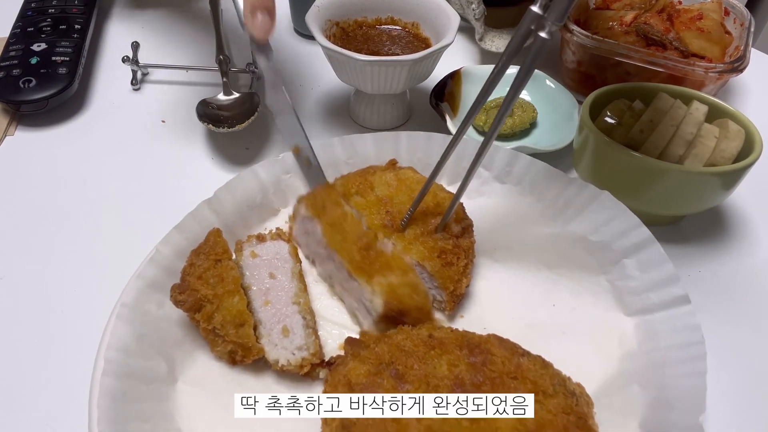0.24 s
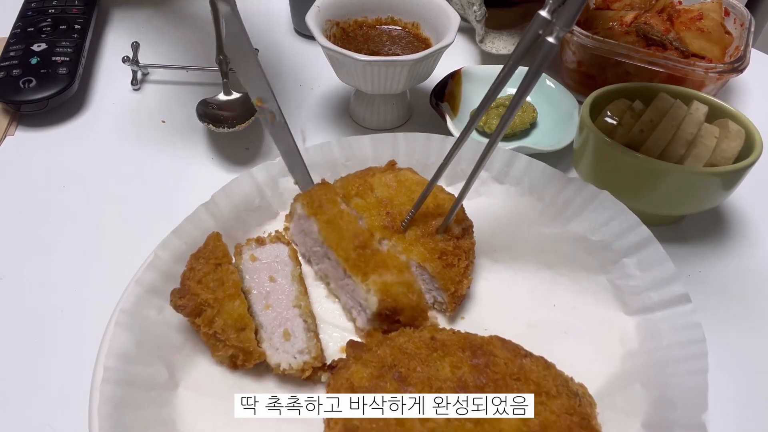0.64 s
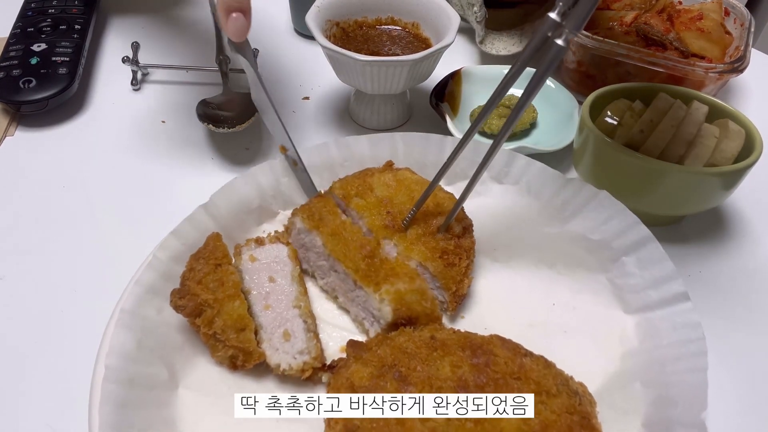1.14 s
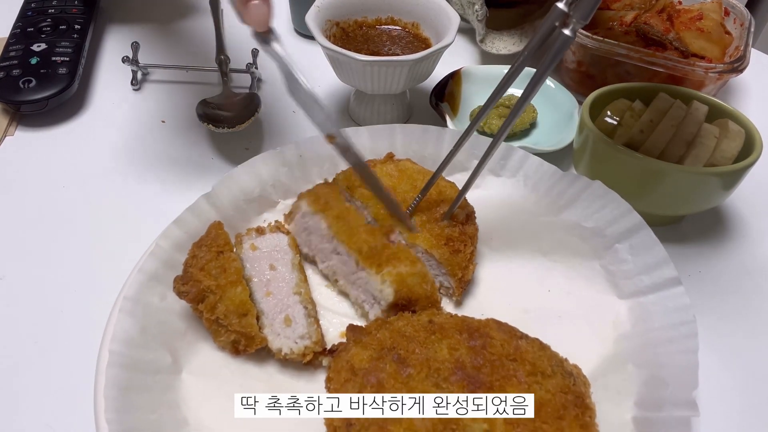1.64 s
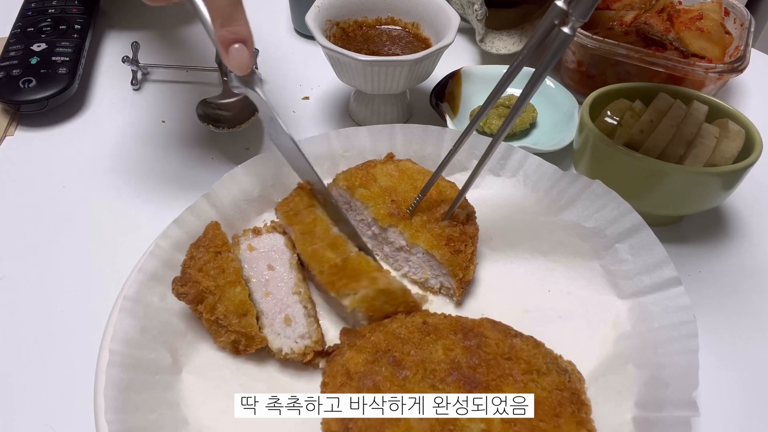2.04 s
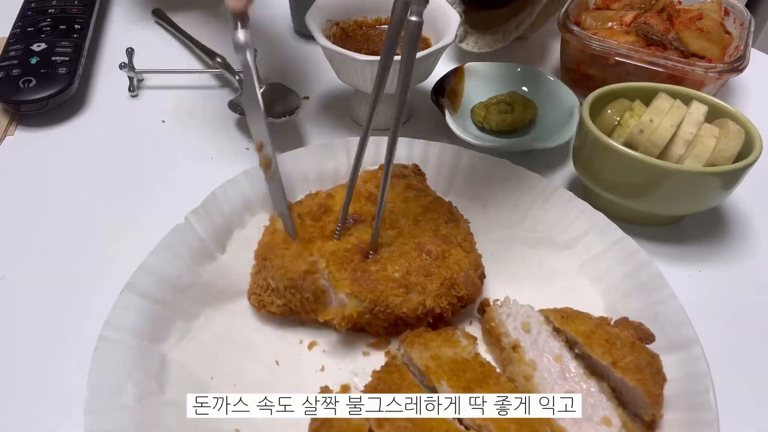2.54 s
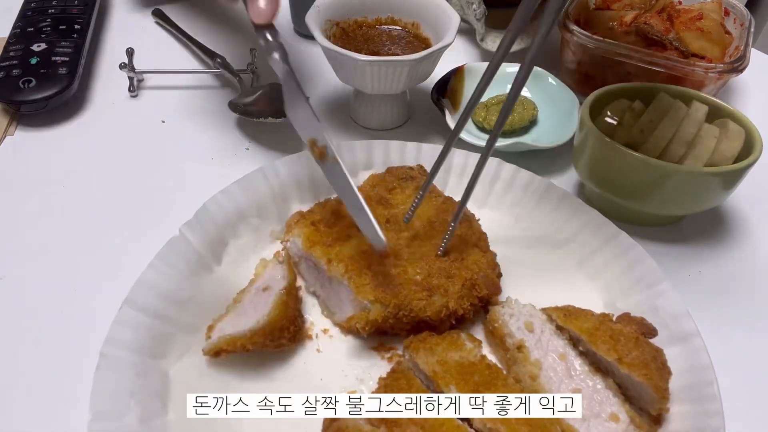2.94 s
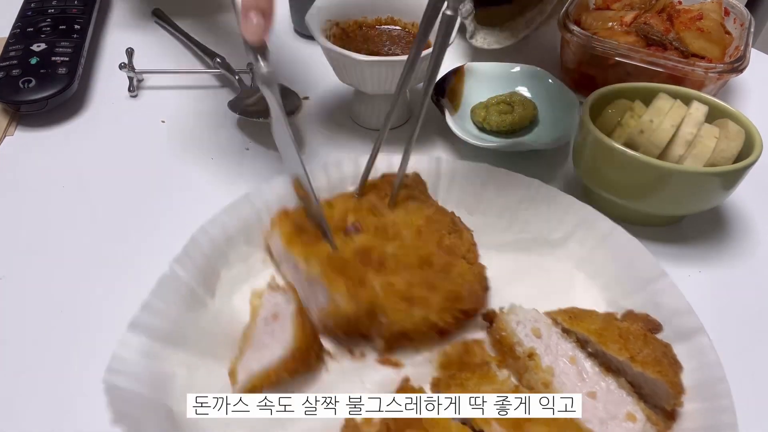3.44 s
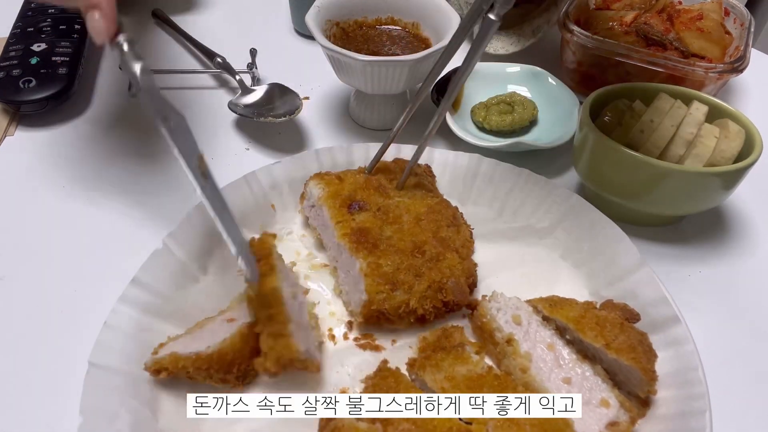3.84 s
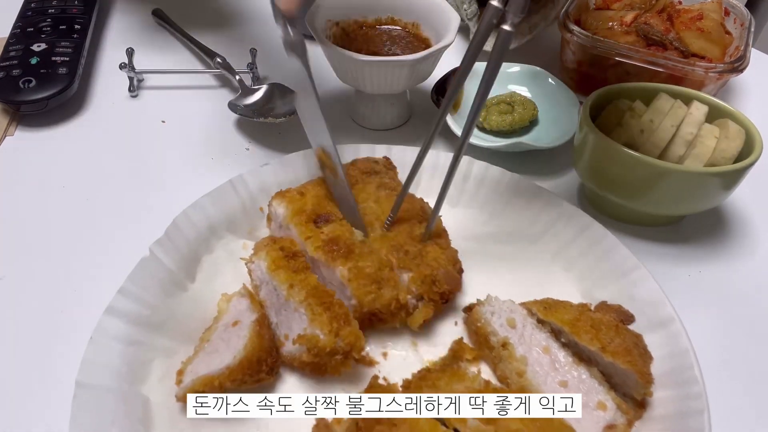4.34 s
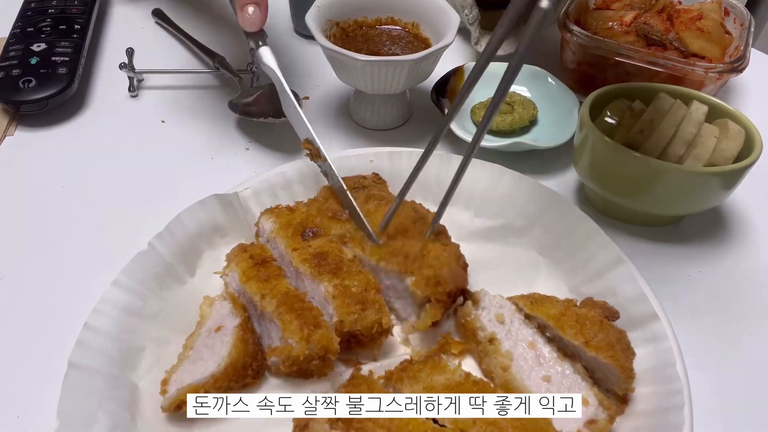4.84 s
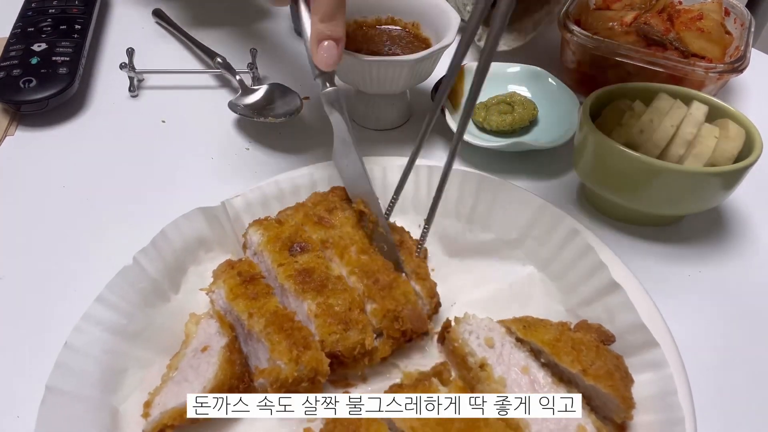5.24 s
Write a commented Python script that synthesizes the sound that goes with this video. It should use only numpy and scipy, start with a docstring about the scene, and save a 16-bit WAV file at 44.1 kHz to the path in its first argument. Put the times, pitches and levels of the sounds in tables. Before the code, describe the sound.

A serrated knife cuts a crisp breaded cutlet on a paper plate, heard close up in a small kitchen. From the start until about 1.1 seconds, a slow cut makes dense crunching and sharp, brittle cracks, strongest near 0.1, 0.4 and 0.7 seconds. The blade rings lightly and knocks the plate against the table with dull thuds, over a low hum. The crunch then thins to faint crackling, with one small snap near 2.2 seconds. At 2.3 seconds the hum abruptly gives way to a thin hiss and quick sawing begins. Each stroke is a rapid run of tooth ticks with a dry rasp and tiny squeaks on the paper. One stroke lasts until 2.7 seconds, followed by crumbling crust. Pairs of strokes follow from 3.1 to 3.7, from 4.1 to 4.7, and more briefly from 5.0 to 5.5 seconds.

```python
"""A serrated knife saws through a crisp breaded cutlet on a paper plate, heard close up in a small kitchen.
First a slow cut: brittle fracture makes the crust crack and crunch, and the blade rings and knocks the
plate against the table, over a low hum. After an abrupt change of scene come quick strokes over a thin
hiss: the teeth tick, rasp and squeak by stick-slip friction on the paper, about 27 times a second."""
import sys
import numpy as np
from scipy import signal
from scipy.fft import rfft, irfft
from scipy.io import wavfile
from scipy.ndimage import uniform_filter1d

SR = 44100
rng = np.random.default_rng(int(sys.argv[2]) if len(sys.argv) > 2 else 0)


def digitize_waveform(pressure):
    """Quantize a signal to 16-bit integers and store it at the path in sys.argv[1].

    Rows of a 2-D input are taken as channels; values are limited to [-1, 1].
    """
    field = np.atleast_2d(pressure).T
    bounded = np.clip(field, -1, 1)
    quanta = np.round(bounded * 32767).astype(np.int16)
    wavfile.write(sys.argv[1], SR, quanta)


N = 242977
SIZE = 2 ** 14  # samples in an impulse response
TIME, FREQ = np.arange(N) / SR, np.arange(SIZE // 2 + 1) * SR / SIZE
CHANGE_S = 2.315
SLOW, QUICK = TIME < CHANGE_S, TIME > CHANGE_S
CRISP_HZ = 5600  # "body" lies below, "crisp" above; levels in dB are relative within each layer


# Pushes of the blade. Each row: peak, rise and fall in seconds, then body, crisp and plate levels in dB.
BLADE_PUSHES = [(.048, 0.043, 0.078, -30, -32, -45.5), (.113, 0.041, 0.1, -32, -35, -30),
                (.215, 0.046, 0.05, -50, -60, -43), (.275, 0.09, 0.046, -30, -30, -56),
                (.385, 0.011, 0.12, -32, -35, -75), (.432, 0.098, 0.066, -31.5, -31.5, -42.5),
                (.462, 0.026, 0.041, -52, -50, -40.5), (.583, 0.042, 0.083, -33, -30.5, -49),
                (.607, 0.035, 0.064, -37.5, -35, -43.5), (.698, 0.047, 0.059, -24, -25.5, -29),
                (.763, 0.062, 0.045, -26, -27.5, -43.5), (.797, 0.018, 0.038, -24, -32, -43),
                (.886, 0.069, 0.067, -29.5, -33, -44.5), (1.002, 0.033, 0.053, -35, -37.5, -39),
                (1.053, 0.07, .02, -36, -40, -38.5), (1.15, 0.19, .24, -47, -49.5, -53),
                (1.35, .12, 0.1, -50, -48.5, -70), (1.53, 0.071, 0.058, -60.5, -62, -82.5),
                (1.595, 0.016, 0.097, -55, -54.5, -72.5), (1.85, 0.043, 0.13, -59, -57, -93),
                (1.94, 0.09, 0.11, -54.5, -53, -90), (2.06, 0.19, 0.55, -46, -44.5, -95),
                (2.27, 0.25, 0.17, -45.5, -41.5, -95)]

def slow_cut(count=4):
    """Forced vibration: each push crushes and scrapes the crust and drives the blade."""
    friction = np.sqrt(swells(BLADE_PUSHES)[:2]) * clumps(per_s=110, depth_db=5) * SLOW
    out = blade(friction[0]) + scrapes()
    for k, (stretch, share) in enumerate(spots(shift=.06, wander_db=4, count=count)):
        crust = crunch(friction * share, stretch) + cracks(k, count, stretch)
        out += kitchen(crust, right_db=-.6, near=(-4.5, .008), room=(-12, .18))
    return out

# The loudest snaps. Each row: start in seconds, body and crisp energies in dB, crumbling time in seconds.
CRUST_SNAPS = [(.022, -14, -10, .0008), (.0334, 0, 1, .0006), (.0407, -6, -2, .0006), (.048, -8, -7, .001),
               (.0543, -7, -8.5, .001), (.1113, -8, -5, .001), (.1135, -3, -.5, .001),
               (.1195, -5, -2.5, .0008), (.1263, -8, -3, .001), (.1345, -13, -13, .0008),
               (.1991, -25, -22, .0006), (.3622, -11, -17, .0014), (.3767, -3.5, -4.5, .001),
               (.402, -11, -8.5, .0014), (.4245, -6, -4, .0014), (.427, -7, -4, .001), (.431, -3, -2, .001),
               (.4365, -7, -5, .0014), (.4408, -8, -9, .0014), (.4465, -7, -2, .0014),
               (.6516, -18, -14, .0006), (.683, -6, -4.5, .0014), (.6897, -3.5, 7.5, .0005),
               (.7132, -7, 3.5, .0003), (.725, -9, -8, .0008), (.7434, -23, -9.5, .0006),
               (.774, -22, -12, .0005), (.7818, -25, -4, .0005), (.7868, -25, -7, .0004),
               (.7898, -22, -4, .0003), (.8002, -16, -4, .0003), (.8026, -10, -1, .0006),
               (.8836, -28, -16, .001), (.902, -25, -10, .0008), (1.0612, -23, -14.5, .0008),
               (1.1125, -17, -14, .0015), (1.4312, -33, -27, .002), (1.549, -41, -33, .001),
               (1.582, -24.5, -20, .0035), (1.1687, -35, -17, .001), (1.2564, -28, -16, .0008),
               (2.2133, -36, -3.5, .0003)]
# Spectrum of a snap. Each row: frequency in Hz, level in dB.
SNAP_SPECTRUM = [(300, -9), (900, -15), (1250, 0), (1900, 3.5), (2800, -1), (3800, -7.5), (5000, 1.5),
                 (7000, -1), (10000, -10), (13000, -7), (16000, -11)]

def cracks(spot, count, stretch):
    """Brittle fracture: large flakes of crust release their elastic energy all at once."""
    flakes = np.array(CRUST_SNAPS)[spot::count]
    drive = snaps(flakes[:, :3], crumble=5.4, crumble_s=flakes[:, 3])
    return amp(-.5) * contact(drive, SNAP_SPECTRUM, stretch, low_hz=370, bend_s=.00028, order=3)

# Spectrum of crushed crust. Each row: frequency in Hz, level in dB.
CRUNCH_SPECTRUM = [(400, -7.5), (900, -14), (1300, -13.5), (1850, -6), (2800, -11.5), (3750, -6),
                   (4600, -0.5), (5500, 1.5), (6700, 6.5), (9000, -2), (12500, -7.5), (14000, -3),
                   (15500, -21)]

def crunch(friction, stretch):
    """Acoustic emission: many small fractures and a few larger ones merge into a fizz."""
    crumbs = grains(per_s=3000, spread_db=3.5) + amp(-9) * grains(per_s=70, spread_db=1.2)
    drive = friction * crumbs
    return amp(-1.2) * contact(drive, CRUNCH_SPECTRUM, stretch, low_hz=508, bend_s=.000092, order=3)

# Scrapes of the edge. Each row: centre and length in seconds, pitch in Hz, level in dB.
EDGE_SCRAPES = [(.0425, 0.0042, 1176, -24), (.0495, 0.0043, 1150, -34.5), (.056, 0.0081, 1190, -32.5),
                (.073, 0.024, 1280, -46), (.103, 0.015, 1800, -42), (.1145, 0.0081, 1910, -24.5),
                (.277, .036, 1380, -44.5), (.38, 0.0074, 1760, -40.5), (.403, 0.015, 1510, -41.5),
                (.434, 0.028, 1175, -35.5), (.594, 0.035, 1360, -46), (.688, 0.023, 1800, -33),
                (.806, 0.0051, 1750, -51), (.975, 0.055, 6470, -46.5), (1.02, 0.033, 5530, -48),
                (1.114, 0.0048, 1330, -39), (2.08, 0.081, 1850, -63.5), (2.24, .09, 1820, -64)]

def scrapes():
    """Resonance: the scraped crust answers with a hollow note."""
    return kitchen(judders(EDGE_SCRAPES, width_hz=480), right_db=.5, near=(-10, .013), room=(-8.5, .2))

# The blade breaks through. Each row: start in seconds, plate level in dB, length of the push in seconds,
# blade level in dB, place from 0 (middle) to 1 (rim).
BREAKTHROUGHS = [(.034, -10, 0.0025, -29.5, 0), (0.1151, 6.5, 0.00024, -0.5, 0),
                 (0.261, 3.5, 0.0068, -15, 0.15), (0.4479, 0, 0.0042, -9, 0), (.568, -17.5, 0.0013, -23, 0),
                 (0.6931, -1.5, 0.0013, -5, 0.92), (.745, -4, 0.00024, -8, 0.59),
                 (0.886, -15.5, 0.0031, -26, 0), (1.012, -10.5, 0.0017, -16, 0.16),
                 (1.039, -9, 0.0023, -40, 0.9)]

def knocks():
    """Cushioned impact: the blade knocks the plate through the meat; a longer push sounds duller."""
    out, t = np.zeros(N), TIME[:SIZE]
    for start, db, length, _, rim in BREAKTHROUGHS:
        push = t * np.exp(-t * 2 * np.pi / length)
        add(out, start, amp(db) * irfft(rfft(push / push.sum()) * plate_response(rim)))
    return out * amp(4.5)

# Modes of the loaded plate. Each row: frequency in Hz, level in dB, T60 in seconds, rim change in dB.
PLATE_MODES = [(141.5, -20.5, .36, -10), (263, -24.5, .3, 9), (735, -21, .05, 0), (328, -4, .04, 0),
               (410, -7, .03, 0), (562, 3.5, .026, 0), (620, -5, .02, 0), (1470, -25, .03, 0)]

def plate_response(rim):
    """Mode shapes: toward the rim the plate's lowest mode gives way to the second."""
    return ringing([(hz, db + rim * rim_db, t60) for hz, db, t60, rim_db in PLATE_MODES])

def plate():
    """Free and forced vibration: the plate thuds at each knock and shudders under the dragging blade."""
    shake = np.sqrt(swells(BLADE_PUSHES)[2]) * SLOW
    shudder = amp(-1.5) * filtered(shake * grains(per_s=2000, spread_db=-2), plate_response(rim=.37))
    return kitchen(knocks() + shudder, right_db=3.5, near=(-16, .012), room=(-15, .28))

# Modes of the blade. Each row: frequency in Hz, level in dB, T60 in seconds.
BLADE_MODES = [(1880, -9.5, .04), (2220, -3.5, 0.039), (2580, -6, 0.12), (3743, 3.5, 0.066),
               (4240, -5.5, 0.027), (6500, -9.5, 0.055)]

def blade(friction):
    """Modal ringing: the steel rings as it breaks through, and sings faintly under a firm push."""
    firmness = np.sqrt(friction / (friction + amp(-32.5)))
    force = amp(-14.5) * friction * firmness * grains(per_s=3900, spread_db=-2)
    for start, _, _, db, _ in BREAKTHROUGHS:
        add(force, start, amp([db]))
    return filtered(force, ringing(BLADE_MODES)) * np.ones((2, 1))

# Quick strokes. Each row: first and last tooth in seconds, number of teeth, speed-up as a fraction,
# body and crisp levels in dB.
SAW_STROKES = [(2.342, 2.688, 10, 0.15, -38.5, -37), (3.087, 3.363, 8, -0.12, -40, -38),
               (3.463, 3.695, 9, 0.34, -43, -66), (4.108, 4.387, 9, -0.022, -42.5, -43),
               (4.429, 4.655, 7, 0.049, -39, -39), (5.022, 5.172, 5, 0.17, -40.5, -40),
               (5.327, 5.484, 5, 0.13, -40.5, -43.5)]

def passing_teeth(scatter_db=4, ease_db=2):
    """Tooth rate is speed over spacing; gives each tooth's time in seconds, body and crisp dB."""
    teeth = []
    chances = rng.standard_normal((len(SAW_STROKES), 32))
    for (first, last, count, speed_up, body, crisp), chance in zip(SAW_STROKES, chances):
        for travel, luck in zip(np.linspace(0, 1, count), chance):
            press_db = scatter_db * luck - ease_db * (2 * travel - 1) ** 2  # lighter at both ends
            elapsed = travel + speed_up * travel * (1 - travel)
            teeth.append((first + (last - first) * elapsed, body + press_db, crisp + press_db))
    return teeth

def rubbing(fade_s=.038):
    """Sliding friction: the flat of the blade rubs all through a stroke; body and crisp power."""
    power = 0
    for first, last, _, _, body, crisp in SAW_STROKES:
        outside_s = np.abs(TIME - np.clip(TIME, first, last))
        power += np.outer(amp([body - 14.5, crisp - 18]) ** 2, np.exp(-2 * outside_s / fade_s))
    return power

SCUFF_S, SCUFF_LAG_S = .0037, .002934  # a scuff is strongest just after the tooth lets go

def scuffs(teeth):
    """Slip: each tooth gives a bell-shaped burst of friction; body and crisp power."""
    power = np.zeros((2, N))
    t = np.arange(-2 * SCUFF_S, 2 * SCUFF_S, 1 / SR)
    bell = .5 ** ((2 * t / SCUFF_S) ** 2)
    for start, *levels in teeth:
        for track, db in zip(power, levels):
            add(track, start + SCUFF_LAG_S + t[0], amp(db) ** 2 * bell)
    return power

# A slice parts and crumbles. Each row: peak, rise and fall in seconds, body and crisp levels in dB.
CRUMBLING = [(2.69, 0.075, 0.16, -47, -44.5), (2.85, 0.039, 0.11, -55.5, -46),
             (3.3, 0.069, 0.11, -59, -48.5), (3.49, 0.065, 0.028, -38.5, -40),
             (3.675, 0.22, 0.085, -45, -39.5), (3.78, 0.052, 1, -67, -61.5),
             (4.235, 0.028, 0.031, -48, -48), (4.375, 0.099, 0.029, -47, -49),
             (4.79, 0.1, 0.17, -61.5, -54.5), (5.45, 0.12, 0.099, -39.5, -41.5)]
# Modes of the paper. Each row: frequency in Hz, level in dB, T60 in seconds.
PAPER_MODES = [(1135, 5.5, 0.03), (2110, -1, 0.022), (3100, -4, 0.025), (4760, -6, 0.015)]

def sawing(count=4, wall_s=.0093):
    """Impact and friction: the teeth tick and rasp and excite the paper; a nearby wall reflects it all."""
    teeth, rub = passing_teeth(), rubbing()
    crumbling = swells(CRUMBLING) * clumps(per_s=170, depth_db=8) ** 2 * QUICK
    uneven_rub = rub * clumps(per_s=150, depth_db=15) ** 2
    friction = amp(-3.5) * np.sqrt(scuffs(teeth) + uneven_rub + crumbling) * QUICK
    out = squeaks(teeth)
    for k, (stretch, share) in enumerate(spots(shift=.015, wander_db=2.5, count=count)):
        scuff = rasp(share * friction, rub + crumbling, k, count, stretch)
        tick = ticks(teeth, k, count, stretch)
        paper = amp(-19) * filtered(scuff + tick, ringing(PAPER_MODES))
        out += kitchen(scuff + paper, right_db=2, near=(0, .018), room=(-7, .042))
        out += kitchen(tick, right_db=3, near=(-8, .016), room=(-15, .06))
    wall_echo = amp(-18) * filtered(out[::-1], np.exp(-2j * np.pi * FREQ * wall_s))
    return out + wall_echo

# Teeth that catch hard. Each row: start in seconds, body and crisp energies in dB.
HARD_CATCHES = [(2.3901, -8, -20), (2.431, -6.5, -8.5), (2.472, -11.5, -12), (2.512, -24, -33),
                (2.5473, -3.5, -10), (2.5843, -21, -11), (2.6227, -13.5, -20), (2.657, -12, -24),
                (2.684, -12, -11.5), (3.1235, -8, -16.5), (3.159, -4.5, -12.5), (3.194, -4, -0.5),
                (3.2305, -7, -7), (3.2695, -23, -13), (3.3636, -9.5, -10), (3.4945, -15, -15),
                (3.6803, -14.5, -18), (3.7022, -14, -14), (4.146, -16.5, -18), (4.1797, -13, -12),
                (4.248, -12, -8.5), (4.2869, -6.5, -6.5), (4.3232, -9, -14), (4.3936, -3, -7.5),
                (4.4349, -12.5, -11.5), (4.4724, -21, -17), (4.511, -24, -40), (4.5457, -22.5, -42),
                (4.5828, -4, -13), (4.6153, -2, -7), (4.646, -13, -21), (5.0604, -10, -10.5),
                (5.108, -23, -31), (5.1408, -12, -15), (5.4431, -14, -17)]
# Spectrum of a tick. Each row: frequency in Hz, level in dB.
TICK_SPECTRUM = [(150, -20), (300, -53), (450, -15), (800, -25), (1120, 1), (1600, -2), (2400, 2),
                 (3100, 7.5), (3750, -4.5), (4250, 4.5), (4800, 10.5), (5130, 6), (5350, -10), (5900, -3),
                 (7200, -3.5), (10000, 3), (14500, 12)]

def ticks(teeth, spot, count, stretch):
    """Elastic release: some teeth catch hard and let go; the others only tick."""
    catch_times = np.array(HARD_CATCHES)[:, 0]
    light = [(start, body + 4.5, crisp + 4.5) for start, body, crisp in teeth
             if np.min(np.abs(catch_times - start)) > .012]
    drive = snaps((HARD_CATCHES + light)[spot::count], crumble=.3, crumble_s=.0005)
    return contact(drive, TICK_SPECTRUM, stretch, low_hz=245, bend_s=.000914, order=8)

# Single flakes break off. Each row: start in seconds, crisp energy in dB.
LOOSE_FLAKES = [(2.5999, -12.5), (2.6355, -13.5), (2.6523, -11.5), (2.6928, -12), (2.7125, -12.5),
                (2.7388, -10), (2.7617, -18.5), (2.77, -16), (2.8, -17.5), (2.8228, -22), (2.837, -12.5),
                (2.866, -17), (3.282, -15.5), (3.5715, -20), (3.6518, -17), (3.7813, -18), (4.161, -15)]
# Spectrum of the rasp. Each row: frequency in Hz, level in dB.
RASP_SPECTRUM = [(150, -43), (300, -25.5), (450, -9), (800, -17), (1120, 0), (1700, -4.5), (2300, -2.5),
                 (3100, -4.5), (3900, -6.5), (4700, -6), (5800, -4.5), (8000, -9.5), (11000, -10.5),
                 (14500, -4)]

def rasp(friction, stray_power, spot, count, stretch):
    """Roughness noise: friction comes in tiny grains, while flakes snap and stray crumbs crackle."""
    grit = friction * grains(per_s=3500, spread_db=4.5)
    flakes = [(start, db - 15.5, db) for start, db in LOOSE_FLAKES[spot::count]]  # hardly any body
    breaks = snaps(flakes, crumble=2, crumble_s=.002)
    strays = amp([[-15], [-9]]) * np.sqrt(stray_power) * grains(per_s=60, spread_db=5.5) * QUICK
    return contact(grit + breaks + strays, RASP_SPECTRUM, stretch, low_hz=124, bend_s=.000652, order=8)

# The louder squeaks. Each row: centre and length in seconds, pitch in Hz, level in dB.
PAPER_SQUEAKS = [(2.347, 0.007, 1110, -45.5), (2.4695, 0.0072, 1290, -30.5), (2.508, 0.0098, 1110, -37.5),
                 (2.543, 0.0062, 1130, -36.5), (3.319, 0.013, 1120, -42), (3.462, 0.0087, 1080, -41.5),
                 (4.508, 0.0058, 1440, -40), (5.366, 0.013, 1170, -44.5), (5.41, 0.02, 1150, -42.5),
                 (5.446, 0.013, 1156, -41), (5.478, 0.012, 1130, -51)]

def squeaks(teeth, pitch_hz=1164, length_s=.0043):
    """Stick-slip on paper: a faint, rough note for every tooth, and a few loud ones."""
    faint = [(start + SCUFF_LAG_S, length_s, pitch_hz * np.exp(.055 * luck), body - 9.5)
             for (start, body, _), luck in zip(teeth, rng.standard_normal(SIZE))]
    notes = judders(PAPER_SQUEAKS + faint, width_hz=300)
    return kitchen(notes, right_db=3, near=(-9, .013), room=(-14, .098))

def judders(table, width_hz):
    """Stick-slip excitation: each burst of irregular slips rings one broad resonance."""
    out = np.zeros(N)
    for (centre, length, hz, db), slips in zip(table, rng.standard_normal((len(table), SIZE))):
        t = np.arange(-1.5 * length, 1.5 * length, 1 / SR)
        b, a = signal.iirpeak(hz, hz / width_hz, fs=SR)
        note = signal.lfilter(b, a, signal.lfilter(b, a, slips))[-len(t):]
        note *= .5 ** ((2 * t / length) ** 2)
        add(out, centre + t[0], amp(db) * np.sqrt(length * SR) * note / np.linalg.norm(note))
    return out

def snaps(table, crumble, crumble_s):
    """Stress release: one sharp impulse, then a moment of crumbling; body and crisp drives."""
    drive, t = np.zeros((2, N)), TIME[:SR // 50]
    fades = np.broadcast_to(crumble_s, len(table))
    for (start, *levels), fade in zip(table, fades):
        force = rng.standard_normal(len(t)) * np.exp(-t / fade)
        force *= crumble / np.linalg.norm(force)
        force[0] = 1
        for track, db in zip(drive, levels):
            add(track, start, amp(db) * force / np.linalg.norm(force))
    return drive

def swells(table, rounding=.85):
    """Loading and release: power moves 20 dB over each rise and fall, one track for each level column."""
    power = 0
    for peak, rise, fall, *levels in table:
        away = np.abs(np.where(TIME < peak, (peak - TIME) / rise, (TIME - peak) / fall))
        power += np.outer(amp(levels) ** 2, amp(-20 * away ** rounding) ** 2)
    return power

def grains(per_s, spread_db):
    """A Poisson process: tiny fractures of uneven size at random moments; rms 1."""
    size = amp(spread_db * np.minimum(rng.exponential(size=N), 4)) * rng.choice([-1, 1], N)
    impulses = size * (rng.random(N) < per_s / SR)
    return impulses / np.std(impulses)

def clumps(per_s, depth_db):
    """Amplitude modulation: crust gives way in uneven clumps; a wandering gain of rms 1."""
    steps = np.cumsum(rng.uniform(.5, 1.5, SIZE)) / per_s
    gain = amp(depth_db * np.interp(TIME, steps, rng.uniform(-1, 1, SIZE)))
    return gain / np.sqrt(np.mean(gain ** 2))

def spots(shift, wander_db, count):
    """A moving contact point: each spot has its own frequency stretch and share of the friction."""
    steps = np.arange(0, TIME[-1], .02)
    wander = rng.standard_normal((count, len(steps)))
    share = amp([wander_db * np.interp(TIME, steps, path) for path in wander])
    return zip(1 + shift * np.linspace(-1, 1, count), share / np.linalg.norm(share, axis=0))

def contact(drive, spectrum, stretch, low_hz, bend_s, order):
    """Dispersion: bending waves bring the treble of both coloured drives first, 1 kHz bend_s later."""
    gain = colour(np.array(spectrum) * [stretch, 1]) * highpass(low_hz, order=3)
    crossover = highpass(CRISP_HZ, order)
    body = unit(gain * np.sqrt(1 - crossover ** 2), band=FREQ > 800)
    crisp = unit(gain * crossover)
    bending = np.exp(-4j * np.pi * bend_s * np.sqrt(1000 * FREQ))
    return filtered(drive[0], causal(body) * bending) + filtered(drive[1], causal(crisp) * bending)

def ringing(modes):
    """Modal superposition: the response of damped modes, shaped by a small object's weak bass radiation."""
    t = TIME[:SIZE]
    ring = sum(amp(db) * np.cos(2 * np.pi * hz * t) * amp(-60 * t / t60) for hz, db, t60 in modes)
    tone = colour([(630, 12), (850, -3), (1400, -9.5), (4000, -.5), (9000, -11)])
    return unit(rfft(ring) * causal(highpass(130, order=2) * tone))

def kitchen(x, right_db, near, room):
    """Reverberation: near scatter off table and dishes, then the room; each is (dB, T60 in seconds)."""
    t, echoes = TIME[:SIZE], 0
    for (db, t60), apart_hz in ((near, 4000), (room, 350)):
        tail = diffuse(apart_hz, count=SIZE) * amp(-60 * t / t60) * (t > .0004)
        echoes += amp(db) * unit(rfft(tail))
    return filtered(x, 1 + echoes) * amp([[-right_db / 2], [right_db / 2]])

# The left microphone port against the right. Each row: frequency in Hz, phase lead in radians at the
# crust and deep in the cut, level in dB.
PORT_CUES = [(20, 0, 0, 0), (300, -.2, -.1, -1), (600, -.3, -.4, -4), (1000, -.1, 0, -8),
             (1300, -.2, .1, -10), (1900, -.4, -.3, -3.5), (2500, -.7, -.4, -3.5), (3600, -1.6, -.3, -1),
             (5000, -2.4, -.7, -4), (7000, -1.7, -1.3, -3), (8500, -.7, -.7, -.5), (10500, 0, 0, 0),
             (12300, 2.1, 2.1, 0), (14500, 3.1, 3.1, -.5)]

def ports(x, deep_from_s=.41, deep_to_s=.78):
    """Near field: each port hears its own level and phase; the phase shifts as the blade sinks in."""
    hz, *columns = np.transpose(PORT_CUES)
    shallow_lead, deep_lead, db = (np.interp(FREQ, hz, column) for column in columns)
    deep = uniform_filter1d(1. * ((TIME > deep_from_s) & (TIME < deep_to_s)), size=SR // 25)
    return sum(filtered(x * share, np.array([amp(db / 2) * np.exp(1j * lead), amp(-db / 2)]))
               for share, lead in ((1 - deep, shallow_lead), (deep, deep_lead)))

# Spectra of the hum and the hiss. Each row: frequency in Hz, spectral density in dB.
HUM_SPECTRUM = [(15, -55.5), (25, -18), (80, -7.5), (170, -7), (217, -10), (489, -16.5), (591, -37.5),
                (695, -22.5), (754, -30), (1940, -60), (5000, -62), (14400, -69.5), (16000, -41.5)]
HISS_SPECTRUM = [(35, -101), (60, -89), (287, -13), (338, -17.5), (427, -3), (503, -12), (621, -7),
                 (682, -6), (1140, -7), (2970, -12), (4860, -18), (5460, -15), (8920, -44), (16000, -34)]
# Faint resonances in the hiss. Each row: frequency and width in Hz, boost in dB.
HISS_RESONANCES = [(530, 20, 9), (635, 16, 14), (1170, 20, 12), (1232, 16, 10), (1712, 20, 14),
                   (1757, 20, 13), (2340, 20, 8), (2638, 18, 11), (3240, 50, 5)]

def background():
    """Coloured noise: a low hum in the first scene, a thin hollow hiss in the second."""
    second = np.clip((TIME - CHANGE_S) / .0054, 0, 1)
    peaks = amp(sum(db / (1 + (2 * (FREQ - hz) / width) ** 2) for hz, width, db in HISS_RESONANCES))
    hum = amp(-56.5) * filtered(diffuse(apart_hz=130), unit(colour(HUM_SPECTRUM)))
    hiss = amp(-58.5) * filtered(diffuse(apart_hz=1000), unit(colour(HISS_SPECTRUM) * peaks))
    return hum * (1 - second) + hiss * second

def diffuse(apart_hz, count=N):
    """A diffuse field: noise at two ports is alike in the bass, unrelated in the treble."""
    mid, side = rng.standard_normal((2, count))
    side = filtered(side, highpass(apart_hz, order=1))
    return np.array([mid + side, mid - side]) / np.sqrt(2)

def amp(db):
    """Decibels to amplitude ratio."""
    return 10 ** (np.asarray(db) / 20)

def colour(points):
    """Spectral envelope through (Hz, dB) points."""
    hz, db = np.transpose(points)
    return amp(np.interp(np.log(FREQ + 1), np.log(hz), db))

def highpass(hz, order):
    """Gain of a maximally flat high-pass."""
    return 1 / np.sqrt(1 + (hz / (FREQ + 1)) ** (2 * order))

def causal(gain):
    """Minimum phase: the response with this gain that starts at once and rings out."""
    cepstrum = irfft(np.log(np.maximum(gain, 1e-5)))
    cepstrum[1:SIZE // 2] *= 2
    cepstrum[SIZE // 2 + 1:] = 0
    return np.exp(rfft(cepstrum))

def filtered(x, response):
    """Convolution: pass a sound through a frequency response."""
    lead = SIZE // 16
    impulse = np.roll(irfft(response), lead, axis=-1)
    y = signal.oaconvolve(np.atleast_2d(x), np.atleast_2d(impulse), axes=-1)
    return np.squeeze(y[:, lead:lead + x.shape[-1]])

def unit(response, band=True):
    """Normalisation to unit energy inside a band."""
    return response / np.sqrt(np.mean(np.abs(response) ** 2 * band))

def add(track, start_s, sound):
    """Superposition: mix a sound into a track."""
    start = int(np.clip(start_s * SR, 0, N - 1))
    track[start:start + len(sound)] += sound[:N - start]

def scene():
    """Superposition of both cuts and the room behind them."""
    return ports(slow_cut() + plate()) + sawing() + background()

def record(dry, ceiling=.85, top_hz=16200):
    """Soft saturation rounds only the highest peaks; a low-pass cuts the top."""
    rounded = dry / (1 + (dry / ceiling) ** 6) ** (1 / 6)
    return signal.sosfilt(signal.ellip(8, .2, 70, top_hz, fs=SR, output="sos"), rounded)


dry = scene()
out = record(dry)
digitize_waveform(out)
```